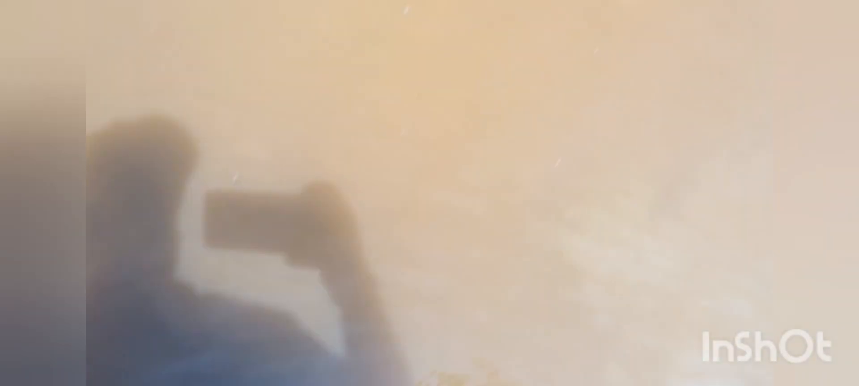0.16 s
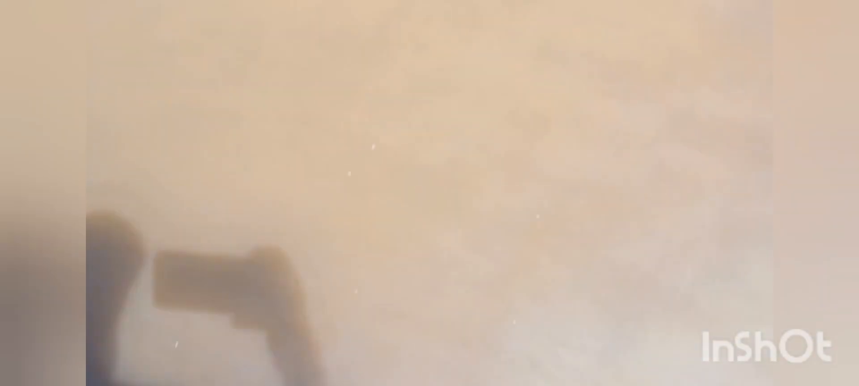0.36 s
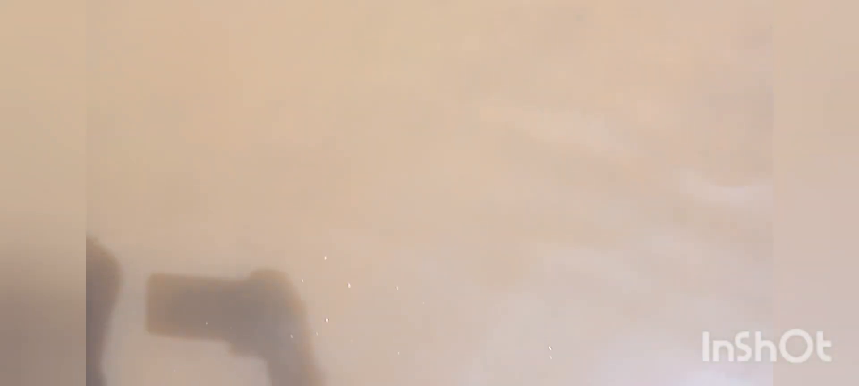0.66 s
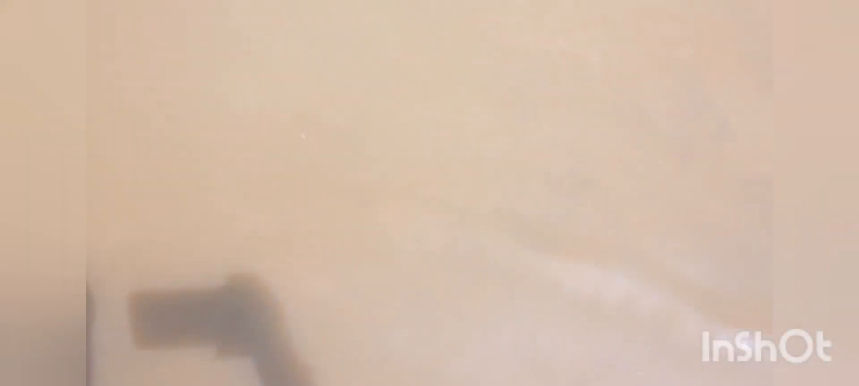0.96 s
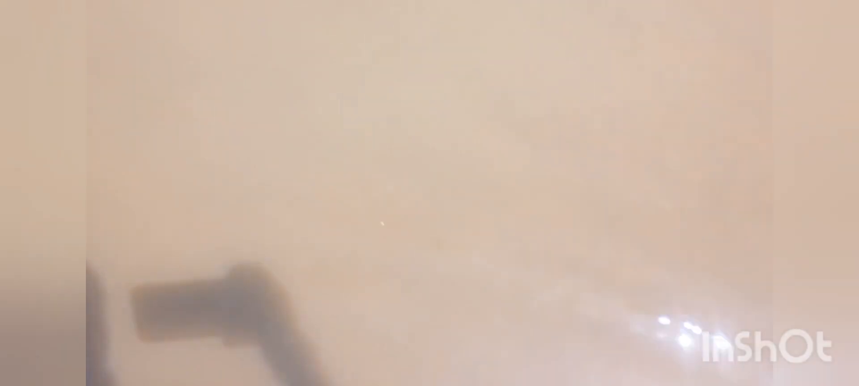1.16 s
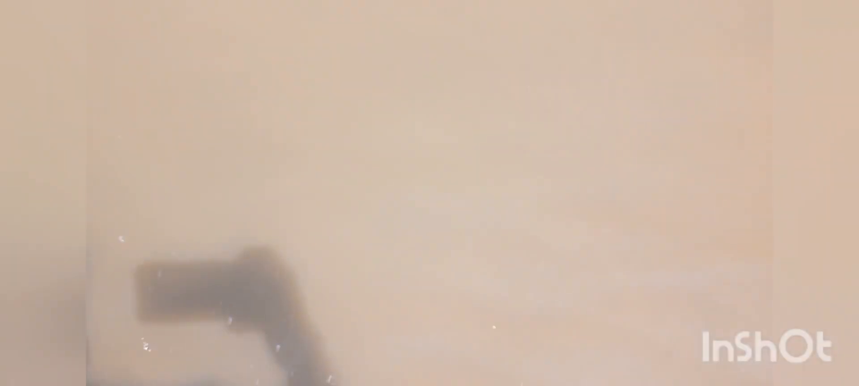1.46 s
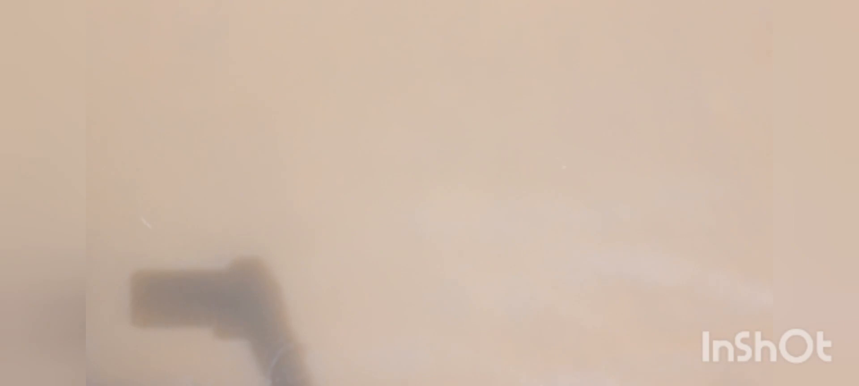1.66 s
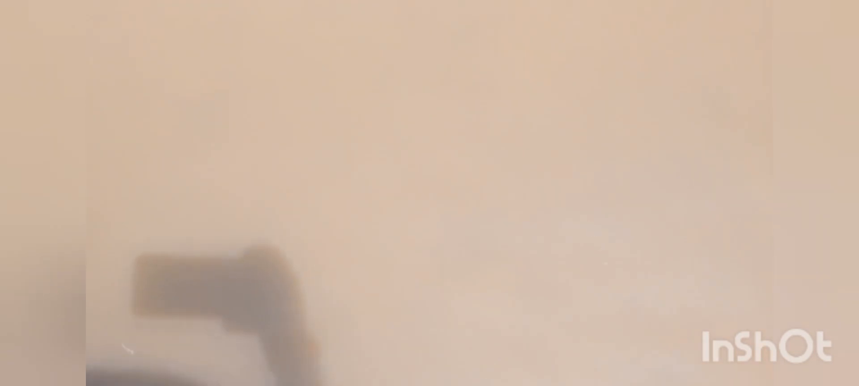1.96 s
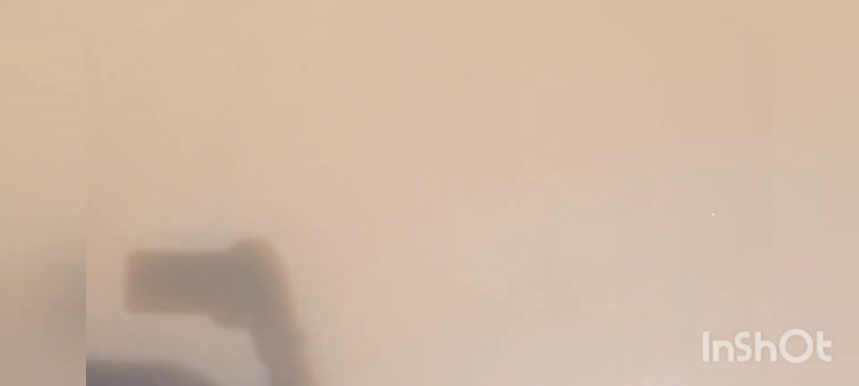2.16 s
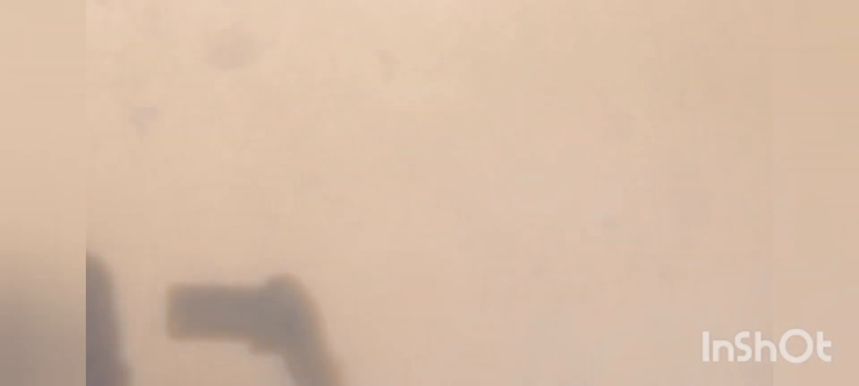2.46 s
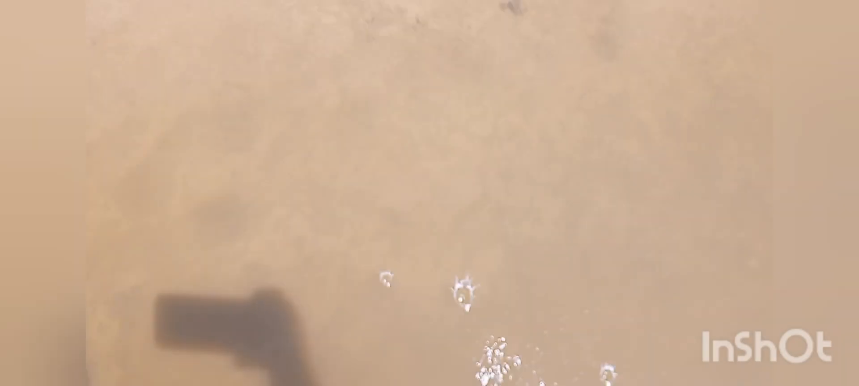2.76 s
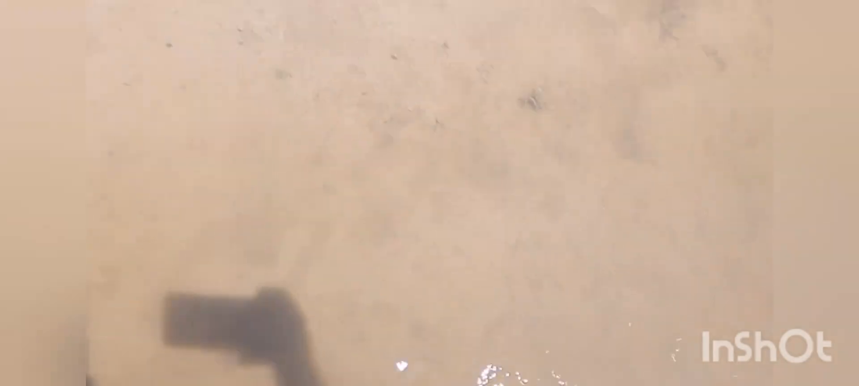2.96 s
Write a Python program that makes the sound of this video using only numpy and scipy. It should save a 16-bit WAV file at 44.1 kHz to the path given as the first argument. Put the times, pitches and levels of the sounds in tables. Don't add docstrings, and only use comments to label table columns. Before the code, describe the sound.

Close phone pickup outdoors: water is shoved in low surges with dull slaps, bubbles gulp and glug, and spray runs off a net in ringing drops and fizz, with a big glug near the end.

```python
import sys
import numpy as np
from scipy import signal
from scipy.fft import rfft, irfft, next_fast_len
from scipy.io import wavfile
from scipy.ndimage import uniform_filter1d, map_coordinates

SR = 44100
rng = np.random.default_rng(int(sys.argv[2]) if len(sys.argv) > 2 else 0)


def waveform_to_disk(signal):
    frames = np.transpose(np.atleast_2d(signal))
    scaled = np.clip(frames, -1, 1) * 32767
    samples = np.round(scaled).astype(np.int16)
    wavfile.write(sys.argv[1], SR, samples)


def attenuation_scalar(level_db):
    decades = np.asarray(level_db, float) / 20
    return 10 ** decades


N = 136710

# (start [s], crest [s], end [s], strength [dB])
SHOVES = [(-.03, .015, 0.17755, -47), (.1, .2, 0.3257, -50.5), (.24, .43, 0.916, -43.5),
          (.545, .57, 0.77564, -25.5), (.62, .73, 0.89972, -34.5), (.95, 1.06, 1.15, -40),
          (1.07, 1.13, 1.267, -29.5), (1.46, 1.54, 1.64, -33), (1.6, 1.84, 1.97, -39),
          (2.0, 2.04, 2.2016, -36), (2.255, 2.3, 2.4453, -29.5), (2.42, 2.5, 2.6, -32.5),
          (2.53, 2.68, 2.8, -27.5), (2.8, 2.87, 2.97, -36.5), (2.96, 3.04, 3.14, -46)]
# (time [s], peak level [dB], pitch [Hz])
THUMPS = [
    (0.012, -25.5, 78.86),
    (0.555, -12, 152.5),
    (0.5655, -11, 190),
    (0.578, -7.5, 146.4),
    (1.09, -19.5, 119.4),
    (1.534, -17.5, 140.9),
    (1.553, -26, 127.5),
    (2.265, -19, 106),
    (2.346, -18, 174),
    (2.76, -25.5, 89.87),
]
# (frequency [Hz], level [dB per Hz])
SHOVE_COLOUR = [(15, -63), (25, -12.5), (60, 0), (92, 3.5), (170, -5.5), (260, -13), (520, -26),
                (1100, -120)]


def surge():
    lumps = swarm(count=500, lo_hz=51.589, hi_hz=371.16, turns=0.833, rise=0.11113, spread_db=1.5, size=2400)
    rush = filtered(rng.standard_normal(N), lambda f: 4.525 * (f < 500))
    body = coloured(lumps + 0.4726 * rush, SHOVE_COLOUR)
    lumpy = attenuation_scalar(1.056 * wobble(26))
    thumps = typed(THUMPS, trim_db=1.5, turns=0.4478, rise=0.009, soft=0.0801, size=2400)
    return swells(SHOVES) * lumpy * body - thumps


# (start [s], crest [s], end [s], strength [dB])
CHURN = [(-.03, .01, 0.09629, -48), (.16, .22, 0.424, -57), (.26, .37, 0.52557, -41),
         (.54, .6, 0.66982, -34.5), (.66, .72, .8, -39.5), (.9, .99, 0.9903, -39.5),
         (1.03, 1.11, 1.2826, -39), (1.2, 1.34, 1.5, -41), (1.51, 1.55, 1.646, -39),
         (1.66, 1.8, 1.856, -35.5), (1.85, 2.04, 2.118, -33), (2.22, 2.27, 2.4078, -43),
         (2.4, 2.58, 2.67, -38.5), (2.62, 2.76, 2.818, -33), (2.8, 2.9, 2.98, -39), (3.02, 3.07, 3.17, -44)]
# (time [s], peak level [dB], pitch [Hz])
GULPS = [(.413, -33.5, 91.49), (.598, -21.5, 172.2), (.612, -20.5, 150.8), (.634, -23.5, 479.4),
         (.72, -28, 110), (.988, -29.5, 354.8), (1.022, -26, 401.4), (1.061, -28.5, 481.2),
         (1.093, -26, 304.4), (1.108, -24.5, 111.5), (1.148, -29, 124.7), (1.175, -28, 160.4),
         (1.2, -28.5, 258.4), (1.595, -25, 390), (1.649, -31.5, 110.5), (1.79, -31.5, 697.8),
         (1.066, -30, 748.7), (1.859, -26, 496), (1.95, -27, 498.6), (1.999, -25, 293),
         (2.255, -31.5, 473.3), (2.275, -27.5, 680.2), (2.385, -27, 112.8), (2.477, -28, 240.9),
         (2.527, -23.5, 109.5), (2.544, -22.5, 357.6), (2.581, -22, 452), (2.608, -25, 127.2),
         (2.688, -21.5, 101.1), (2.783, -21.5, 325), (2.973, -32, 325.1)]
# (time [s], peak level [dB], pitch [Hz], life [cycles])
GLUGS = [(0.065, -39.5, 541.1, 2.165), (0.27, -32.5, 738.2, 5.15), (0.379, -28, 356.3, 1.757),
         (0.621, -22.5, 604.3, 1.491), (0.709, -23, 527.5, 3.021), (0.912, -31, 691.8, 5.625),
         (1.275, -20, 565.5, 1.537), (1.334, -19, 667.5, 1.647), (1.418, -23, 652.8, 1.224),
         (2.044, -26.5, 410.7, 1.6077), (2.074, -22, 332.6, 1.705), (2.228, -22, 934.2, 2.14),
         (2.707, -9, 615.4, 1.0988), (2.845, -22.5, 613, 1.756)]
# (frequency [Hz], level [dB per Hz])
CHURN_COLOUR = [(120, -55.5), (200, -8), (300, -5), (431, 1), (700, -2), (1500, -17), (1950, -42),
                (3300, -120)]


def churn():
    small = swarm(count=2000, lo_hz=229.97, hi_hz=1486.6, turns=2.8644, rise=0.0907, spread_db=5.0, size=1200)
    gurgle = coloured(small + 2.5 * rng.standard_normal(N), CHURN_COLOUR)
    body = patchy(gurgle, patchy_db=2.2, wide=2, long=14)
    lumpy = attenuation_scalar(1.3 * wobble(28))
    gulps = typed(GULPS, trim_db=-1.5, turns=1.9304, rise=0.04372, soft=0.2413, size=3000)
    glug_life = np.array(GLUGS)[:, 3]
    glugs = typed(GLUGS, trim_db=-2.5, turns=glug_life, rise=0.10733, soft=0.1619, size=1600)
    return swells(CHURN) * lumpy * body + gulps + glugs


# (start [s], crest [s], end [s], flow [dB], extra level of the fine spray [dB])
RUNOFF = [(-.03, 0.029, 0.03753, -49, 5), (0.006, 0.221, 0.26338, -61.5, 2.5),
          (0.261, 0.448, 0.52016, -46, 1), (0.488, 0.613, 0.69864, -46.5, -3.5),
          (0.63, 0.783, 0.88642, -43, 5.5), (0.898, 0.961, 1.0112, -37.5, -15), (0.977, 1.047, 1, -51, -8),
          (1.108, 1.245, 1.33, -35, -1.5), (1.208, 1.347, 1.5615, -37, 2.5), (1.562, 1.736, 1.8, -49.5, 1),
          (1.733, 1.843, 1.98, -34.5, 2.5), (1.857, 1.992, 2.2, -33.5, 5.5), (2.201, 2.231, 2.255, -43, 1),
          (2.24, 2.362, 2.423, -56, -1), (2.373, 2.559, 2.57, -35, -1), (2.514, 2.747, 2.9, -33.5, 5),
          (2.803, 2.93, 3.3321, -40, -1)]
# (frequency [Hz], level [dB per Hz])
SPRAY_COLOUR = [(530, -14), (1000, -0.5), (2020, 0.5), (3300, -0.5), (6600, -11.5), (8200, -25),
                (10400, -33.5), (12200, -54.5), (16000, -41)]
SPLIT_HZ = 4006.6


def runoff():
    drops = swarm(count=4500, lo_hz=1025.1, hi_hz=8000, turns=8.72, rise=0.03033, spread_db=3.5, size=500)
    crackle = swarm(count=4000, lo_hz=1647.7, hi_hz=14598, turns=1.889, rise=0.04374, spread_db=3.5, size=150)
    mix = drops + 0.7452 * crackle + 0.8121 * rng.standard_normal(N)
    spray = patchy(coloured(mix, SPRAY_COLOUR), patchy_db=2.456, wide=3, long=26)
    coarse = filtered(spray, lambda f: 1 / (1 + (f / SPLIT_HZ) ** 10))
    fine_db = np.array(RUNOFF)[:, 4:]
    fine = swells(RUNOFF, fine_db) * attenuation_scalar(1.7286 * wobble(40.09)) * (spray - coarse)
    lumpy = attenuation_scalar(1.8 * wobble(34))
    return mirrored(lumpy * (swells(RUNOFF) * coarse + fine))


# (time [s], half length [s], pitch [Hz], depth [dB])
HOLLOWS = [
    (0.719, 0.1109, 4953, -6),
    (0.841, 0.0676, 1211, -12),
    (1.667, 0.05087, 3758, -11),
    (1.64, 0.03793, 1825, -9.5),
    (2.106, 0.05185, 4941, -8),
    (2.83, 0.080364, 1601, -7),
]


def mirrored(x):
    hz, t, z = signal.stft(x, SR, nperseg=512)
    cut_db = 0
    for s, half, mid, db in HOLLOWS:
        width = 0.1483 * mid
        cut_db = cut_db + db * np.exp(-((t - s) / half) ** 2 - ((hz[:, None] - mid) / width) ** 2)
    return signal.istft(z * attenuation_scalar(cut_db), SR, nperseg=512)[1][:N]


# (time [s], peak level [dB], pitch [Hz])
DRIPS = [(0.1837, -41.5, 1705), (0.2009, -33.5, 1784), (0.3411, -40, 1785), (0.8091, -21, 3584),
         (0.8584, -27, 1922), (0.9064, -27.5, 1570), (0.9682, -22.5, 1606), (1.054, -27.5, 3173),
         (1.11, -28.5, 2413), (1.3478, -16.5, 3201), (1.4222, -34.5, 2062), (1.4382, -14, 3282),
         (1.768, -23.5, 3756), (1.8077, -21, 2044), (2.2128, -22.5, 3408), (2.4053, -20.5, 3507),
         (2.8148, -23, 2923), (2.957, -23, 3463), (3.0373, -26.5, 1897),
         (0.6658, -30.5, 3631),
    (0.9246, -27, 1717),
    (0.9445, -27.5, 1621),
    (0.9614, -37.5, 2213),
    (0.9692, -28.5, 1709),
    (1.0029, -28, 1219),
    (1.0182, -30.5, 1235),
    (1.8356, -24.5, 2845),
         (1.0245, -44.5, 5382),
    (1.516, -25, 4763),
    (1.6155, -44, 5618),
    (1.6891, -39, 5257),
    (1.717, -24, 4688),
    (1.7666, -28.5, 6244),
    (2.6278, -19.5, 5205),
]


def drips():
    return typed(DRIPS, trim_db=-5.0, turns=6.759, rise=0.01856, soft=0.7903, size=700)


# (time [s], peak level [dB], pitch [Hz])
SPATS = [(.0184, -37, 5742), (.2887, -42.5, 8000), (.2954, -42.5, 7057), (.4364, -39.5, 7807),
         (.8144, -29.5, 6603), (1.2206, -20, 3623), (1.2494, -26.5, 5009), (1.3503, -17.5, 6807),
         (1.3912, -23, 6728), (1.4556, -29.5, 6124), (1.5544, -27.5, 4759), (2.0318, -17, 4959),
         (2.2214, -35, 4418), (2.394, -48.5, 7001)]


def spats():
    bursts = typed(SPATS, trim_db=3, turns=2.395, rise=0.02, soft=0.5913, size=300)
    top_hz = 9040
    return filtered(bursts, lambda f: 0.05 + 1 / (1 + (f / top_hz) ** 6))


# (time [s], peak level [dB])
TICKS = [(0.2887, -48), (0.4349, -41.5), (1.1508, -53), (1.2231, -34.5), (1.2366, -26.5), (1.2564, -40.5),
         (1.2735, -34.5), (1.2955, -39), (1.3194, -37), (1.4716, -44.5), (1.6207, -61.5), (1.6621, -54.5),
         (1.7434, -57.5), (1.8163, -46), (1.8457, -48), (1.922, -42), (1.9495, -41), (2.1151, -46),
         (2.3945, -50), (2.5262, -41.5), (2.8155, -44.5), (2.8394, -46), (2.9547, -60)]


def ticks():
    low_hz, top_hz, above_top_db = 6000, 11034, -22
    t60_s, onset_s = 0.02659, 0.0015
    s, db = np.transpose(TICKS)
    k = np.arange(SR // 50)
    fade = attenuation_scalar(db[:, None] - 0.5 - 60 * k / SR / t60_s)
    onset = 1 - np.exp(-k / SR / onset_s)
    puffs = fade * onset * rng.standard_normal((len(s), len(k)))
    at = np.round(s * SR).astype(int)[:, None] + k
    x = np.bincount(at.ravel(), puffs.ravel(), N + SR)[:N]

    def bright(f):
        top = attenuation_scalar(above_top_db) + 1 / (1 + (f / top_hz) ** 14)
        return top / (1 + (low_hz / (f + 1)) ** 4)
    return filtered(x, bright)


def scattered(water):
    t60_s, level_db = 0.08166, -8
    k = np.arange(SR // 4)
    tail = rng.standard_normal(len(k)) * attenuation_scalar(-60 * k / SR / t60_s)
    return attenuation_scalar(level_db) * signal.fftconvolve(water, tail / np.linalg.norm(tail))[:N]


# (frequency [Hz], level [dB per Hz])
AIR_COLOUR = [(18, -63.5), (30, 8.5), (93, -20), (1760, -44), (16000, -52)]


def open_air():
    return attenuation_scalar(-56) * coloured(rng.standard_normal(N), AIR_COLOUR)


def unit(x):
    return x / np.sqrt(np.mean(x ** 2) + 1e-20)


def wobble(rate):
    knots = rng.standard_normal(int(N * rate / SR) + 4)
    return map_coordinates(knots, [np.arange(N) * rate / SR])


def swells(rows, extra_db=0):
    start, crest, end, db = np.transpose(rows)[:4, :, None]
    t = np.arange(N) / SR
    swell = np.clip((t - start) / (crest - start), 0, 1) ** 0.52684
    ebb = np.clip((end - t) / (end - crest), 0, 1) ** 0.58004
    shape = np.where(t < crest, swell, ebb)
    return np.sqrt(np.sum((shape * attenuation_scalar(db + extra_db)) ** 2, axis=0))


def filtered(x, response):
    m = next_fast_len(N + 8192)
    return irfft(rfft(x, m) * response(np.fft.rfftfreq(m, 1 / SR)), m)[:N]


def coloured(x, points):
    hz, p = signal.welch(x, SR, nperseg=2048)
    p = uniform_filter1d(p, size=5) + 1e-4 * p.max()
    f, v = np.transpose(points)

    def response(q):
        wanted = attenuation_scalar(np.interp(np.log(q + 1), np.log(f + 1), v))
        return wanted / np.sqrt(np.interp(q, hz, p))
    return unit(filtered(x, response))


def patchy(x, patchy_db, wide, long):
    z = signal.stft(x, nperseg=256)[2]
    field = uniform_filter1d(rng.standard_normal(z.shape), wide, 0)
    field = uniform_filter1d(field, long, 1)
    return unit(signal.istft(z * attenuation_scalar(patchy_db * unit(field)), nperseg=256)[1][:N])


def bubbles(s, gain, hz, turns, rise, soft, size):
    u = np.arange(size) / SR * hz[:, None]
    life = np.abs(turns * np.ones_like(hz))[:, None] + .1
    climb = 1 + rise * np.minimum(u / life, 3) / 2
    wave = np.sin(2 * np.pi * u * climb) * np.exp(-u / life) * (1 - np.exp(-u / abs(soft)))
    wave *= np.minimum(1, (size - np.arange(size)) / (size / 4))
    wave *= (gain / np.abs(wave).max(1))[:, None]
    at = np.round(s * SR).astype(int)[:, None] + np.arange(size)
    return np.bincount(at.ravel(), wave.ravel(), N + size + SR)[:N]


def swarm(count, lo_hz, hi_hz, turns, rise, spread_db, size):
    when, pitch, rarity, life, sign = rng.random((5, count))
    gain = attenuation_scalar(-spread_db * np.log(rarity * .98 + .02)) * np.sign(sign - .5)
    hz = lo_hz * (hi_hz / lo_hz) ** pitch
    return unit(bubbles(when * N / SR, gain, hz, turns * 4 ** (life - .5), rise, 0.5453, size))


def typed(rows, trim_db, turns, rise, soft, size):
    lag_s = 0.001528
    s, db, hz = np.transpose(rows)[:3]
    return bubbles(s + lag_s, attenuation_scalar(db + trim_db), hz, turns, rise, soft, size)


def scene():
    water = surge() + churn() + runoff() + drips() + spats() + ticks()
    return (water + scattered(water) + open_air())[None]


def roll_off(x):
    return signal.sosfilt(signal.butter(12, 15830, fs=SR, output="sos"), x)


# (frequency [Hz], width [Hz], gain [dB])
PORT_NOTCHES = [(1501.6, 125.96, -3), (4291.2, 451.5, -4), (6264.4, 232.9, 2.5)]


def record(dry):
    mic_low_hz = 53.71

    def microphone(f):
        port_db = sum(db / (1 + ((f - hz) / wide) ** 2) for hz, wide, db in PORT_NOTCHES)
        return attenuation_scalar(port_db) * (1j * f / (mic_low_hz + 1j * f)) ** 2
    return roll_off(filtered(dry[0], microphone)[None])


dry = scene()
out = record(dry)
waveform_to_disk(out)
```